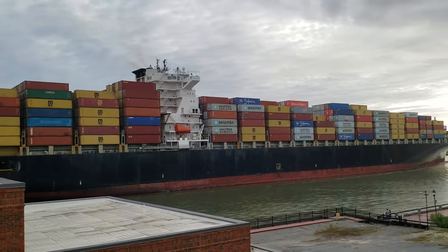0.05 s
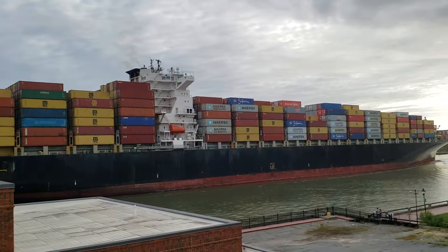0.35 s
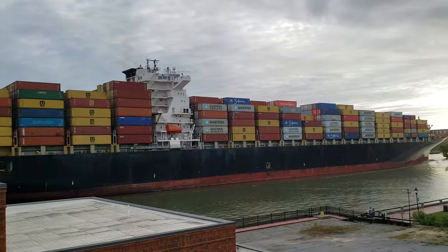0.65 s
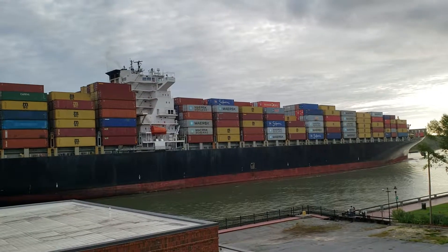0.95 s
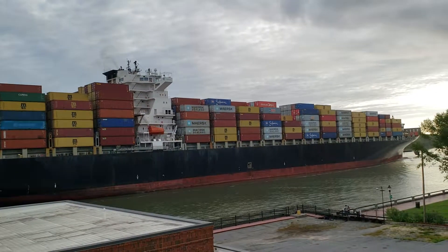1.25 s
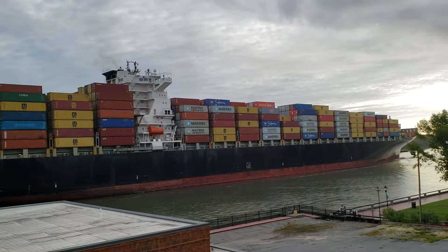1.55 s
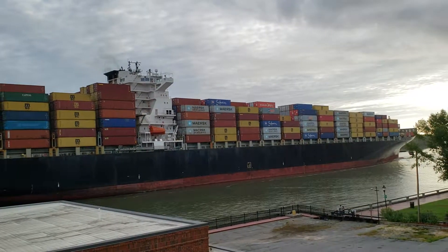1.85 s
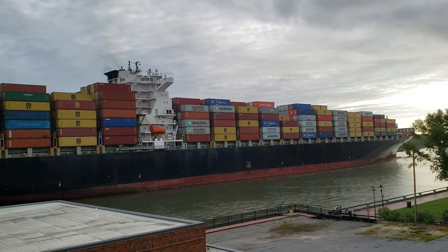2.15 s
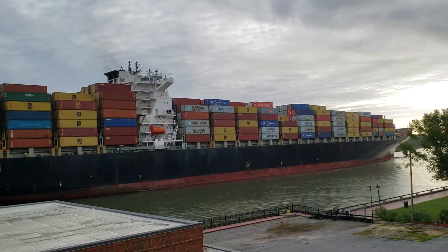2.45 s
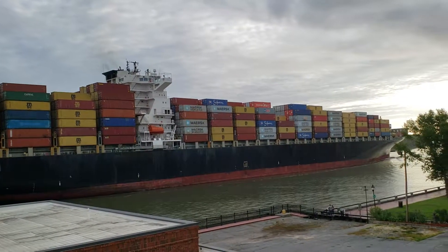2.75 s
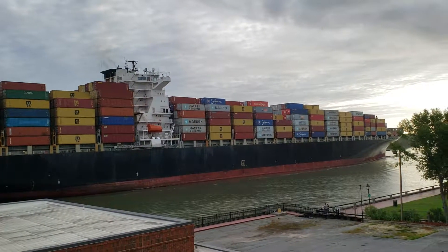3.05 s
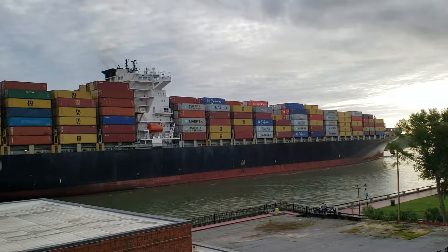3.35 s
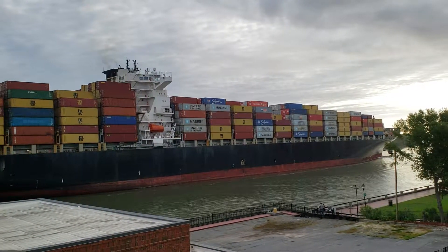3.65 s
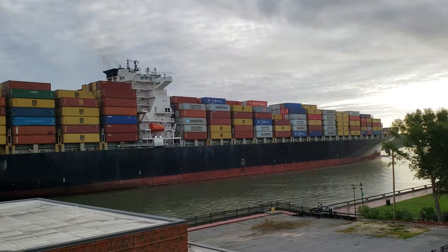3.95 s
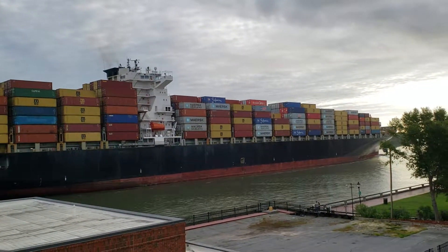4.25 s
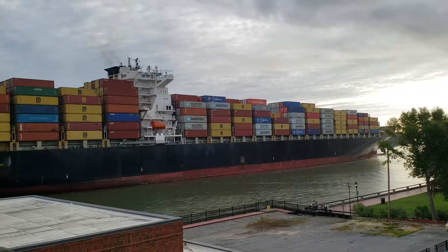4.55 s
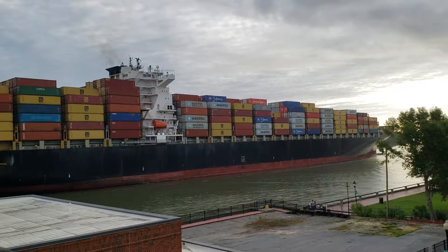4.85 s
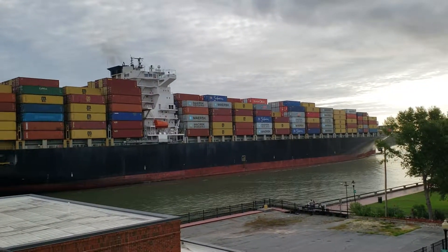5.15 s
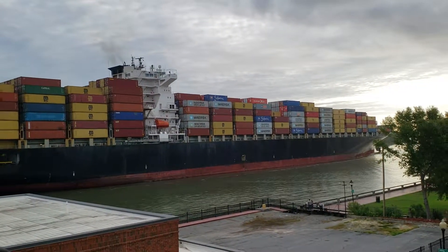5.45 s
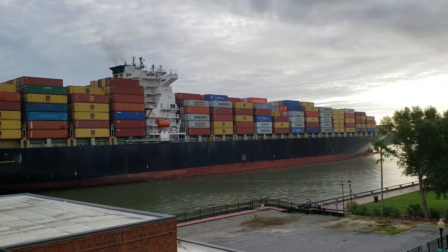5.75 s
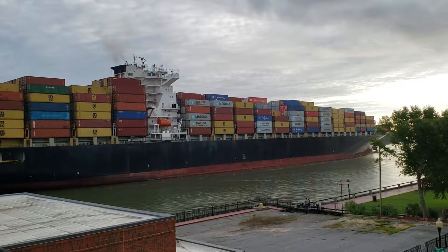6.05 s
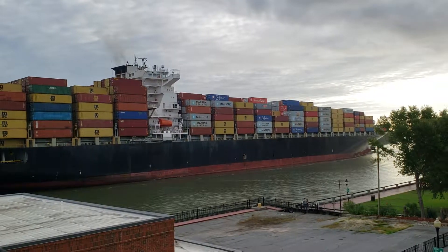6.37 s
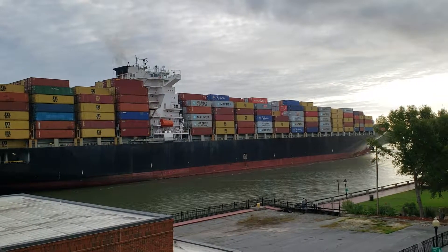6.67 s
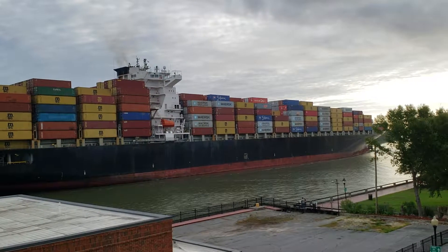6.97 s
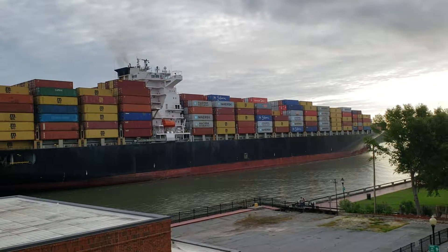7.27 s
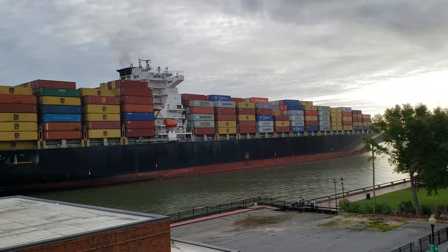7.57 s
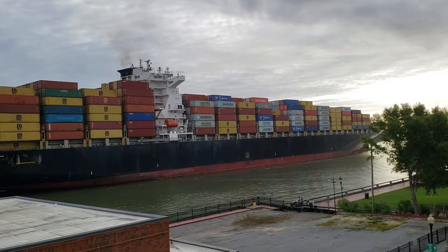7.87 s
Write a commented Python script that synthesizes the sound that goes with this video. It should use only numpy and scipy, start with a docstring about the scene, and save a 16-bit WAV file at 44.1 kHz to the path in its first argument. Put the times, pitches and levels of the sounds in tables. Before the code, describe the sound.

A container ship passes a river bank throughout: a low diesel rumble throbbing about six times a second, with funnel roar, rushing air, slowly beating hums and a very faint high hiss. In the first half second, a heavy steel door close by gives a double bang, a dull thud and then a sharper clattering blow, with a hard echo that fades over about a second. The ship continues alone and grows gradually, swelling slightly around 4 seconds, with fan tones wavering in and out from then on. At about 6.6 seconds the door slams, the loudest moment: the frame clashes, the latch snaps and the panel booms and rings. Loose metal jingles brightly with it, and softer knocks and ticks follow from 7.1 to 7.5 seconds. After the slam the ship's rumble is somewhat quieter and runs on until the end, near 8 seconds.

```python
"""A container ship glides past a river bank: its diesel throbs six times a second under the roar
of funnel and rushing air, with beating machine hums, fan tones and a thin hiss.
Close by, a heavy steel door bangs in a hard, echoing space: a double blow at the start, a full slam
at 6.6 s. The frame clashes, the latch snaps, the leaf booms; the slam shakes loose metal.
The recorder's gain control ducks the ship after the slam."""
import sys
import numpy as np
from scipy import signal
from scipy.fft import rfft, irfft
from scipy.io import wavfile
from scipy.ndimage import uniform_filter1d

SR = 44100
rng = np.random.default_rng(int(sys.argv[2]) if len(sys.argv) > 2 else 0)


def bounce(signal):
    """Save signal as a 16-bit WAV file at the path given by the first command-line argument."""
    frames = np.transpose(np.atleast_2d(signal))
    limited = np.clip(frames, -1, 1)
    pcm = np.round(limited * 32767).astype(np.int16)
    wavfile.write(sys.argv[1], SR, pcm)


N = 348816
T = np.arange(N) / SR

CYCLE_HZ, THROB_S = 5.967, 0.1  # engine cycle; time of one throb
ABEAM_S, BEAM_S, HOLD_S = 3.97, 0.83, 5.7  # stern nearest; facing half-width; tone trends stop
PASSED_S = np.minimum(T, HOLD_S) - ABEAM_S
FACING = np.exp(-((T - ABEAM_S) / BEAM_S) ** 2)  # how squarely the vents face the bank, 0-1

# exhaust orders (multiple of engine cycle, relative level abeam [dB], trend [dB/s])
EXHAUST_ORDERS = [(7, -42, 0.4), (8, -30, .5), (9, -34, -0.6), (11, -50.5, 1), (12, -50, 1.5),
                  (13, -52.5, -2.5), (14, -51, 8.5), (15, -43.5, 3.5), (16, -38.5, -.3), (18, -49.5, 0.2),
                  (20, -53.5, -1), (21, -50, 0.6), (23, -50, 0.3), (24, -50.5, 2), (29, -51, 2.5)]
# machine hums (frequency [Hz])
HUM_HZ = [55.5, 58.85, 59.55, 60.15]
# same hums (level abeam [dB])
HUM_ABEAM_DB = [-52, -38.5, -43, -42]
# engine room fan (blade harmonic, relative level [dB], share of swell [0-1], gain when facing [dB])
FAN_TONES = [(2, -2, 0.37, -5.5), (3, 0, 1, -2.5), (4, -7, 0, 5), (5, -10, 0, -1), (6, -18.5, 0, -3)]
# swells of the strongest fan tone (time [s], level before flutter and facing [dB])
FAN_SWELLS = [(1.7, -65), (3.7, -59), (4.15, -53), (4.95, -48), (5.25, -56), (5.7, -50), (6.0, -59),
              (6.4, -47), (7.4, -58)]
# funnel roar (frequency [Hz], relative density [dB])
ROAR_SPECTRUM = [(90, -27), (150, -16), (210, -4), (280, -6.5), (400, -7), (470, -11.5), (600, -9),
                 (750, -15), (950, -16), (1200, -22), (1700, -27), (3000, -72)]
# rushing air, with the microphone's bright 4-8 kHz colouring (frequency [Hz], relative density [dB])
AIR_SPECTRUM = [(100, -30), (700, -2), (1500, 0), (2000, 0), (2800, -3.5), (3300, -9), (4200, -8.5),
                (5200, -9.5), (6000, -6), (6650, -15), (7500, -10), (8300, -24), (13000, -27), (15800, -27)]
# exhaust rumble (frequency [Hz], relative density [dB])
RUMBLE_SPECTRUM = [(10, -50), (20, -32), (30, -22), (40, -10), (52, -3), (75, -5), (105, -1), (135, -7),
                   (170, -12), (230, -15), (400, -35), (1500, -120)]
# high hiss (frequency [Hz], relative density [dB])
HISS_SPECTRUM = [(6500, -28), (8500, -10), (10000, -7), (10900, 0.5), (11900, 1.5), (12700, -5),
                 (15500, -17)]
# hiss envelope (time [s], relative level [dB])
HISS_ENVELOPE = [(1.4, -70), (2.2, -67), (3.6, -69), (4.3, -77.5), (4.9, -73.5), (5.6, -77.5), (7.7, -79)]
# door blows, levels relative (time [s], clash [dB], latch [dB], boom [dB], boom centre [Hz],
# latch direct-to-echo power [ratio], slap [dB])
DOOR_BLOWS = [(0, -30, -47, -28, 191, 0.73, -4), (.03, -33, -42, -20, 90, 0.35, 2),
              (.285, -21, -32.5, -34, 233, 2.7, -8), (.342, -27.5, -58, -34.5, 283, 0.33, 18.5),
              (.441, -31, -33, -32, 125, 3, 22), (.486, -27, -38, -23.5, 133, .3, 13),
              (6.61, -25, -22.5, -17.5, 170, 1.9, 9), (6.616, -17, -17.5, -12.5, 148, 0.42, 4),
              (6.66, -14.5, -16, -19, 242, 0.39, 14), (6.735, -18.5, -34, -22, 290, 0.55, 8),
              (7.097, -51, -45, -28, 101, 2.5, 0), (7.16, -42, -45, -29.5, 179, 1.6, 6),
              (7.346, -40.5, -49.5, -48, 283, 0.52, -3)]
# steel frame (frequency [Hz], relative density [dB])
CLASH_SPECTRUM = [(25, -43), (50, 6), (110, -2.5), (200, 3), (300, -1), (550, -2.5), (800, -7.5),
                  (1400, -15.5), (2600, -27), (4000, -33), (7500, -29), (9000, -51), (15500, -39)]
# slap of a flat, hard contact (frequency [Hz], share of slap gain [0-1])
SLAP_SHARE = [(700, 0.23), (1400, 0.32), (2600, 0.86), (4500, 1), (8000, 0.083)]
# latch (frequency [Hz], relative density [dB])
LATCH_SPECTRUM = [(1000, -13.5), (2500, -3.5), (3400, -5), (4100, -1), (5400, 2.5), (6400, -2),
                  (7400, -7.5), (8500, -21), (12500, -16.5), (15500, -34)]
# door leaf (frequency [Hz], relative level [dB], T60 [s])
LEAF_MODES = [(87.6, 4.5, 0.64), (106.2, -5.5, 1.4), (128.6, -3, 1.8), (144.9, 5.5, 0.54),
              (173.4, -3.5, 1.4), (205.2, -7, 0.43), (265.2, -6.5, 2.3), (287.7, -2, 2), (321, -7.5, 1.34),
              (373, -20, 1), (502, 2, 0.98), (523, -6, 1.2)]
# echo around the door (frequency [Hz], T60 [s])
ECHO_T60 = [(80, 0.36), (200, 1.81), (500, 1.25), (1000, 1.195), (2500, 1.01), (5500, 0.81), (12000, 0.83)]
# loose metal shaken by the slam (time [s], level [dB])
JINGLES = [(6.668, -33), (6.725, -36), (6.985, -59), (7.098, -53), (7.16, -54), (7.353, -63), (7.398, -55),
           (7.497, -65), (7.75, -62)]
# loose metal (frequency [Hz], relative density [dB])
JINGLE_SPECTRUM = [(3000, -29), (5500, -8), (7500, -5), (9500, 0), (12500, 4), (15500, 1)]
# microphone pair (frequency [Hz], left-right correlation before clipping to +-1)
CORRELATION = [(60, 1.1), (130, 0.65), (290, 0.83), (640, 0.22), (1410, -0.3), (3100, 0), (15000, 0)]
# ship balance (frequency [Hz], left minus right [dB])
SHIP_SIDE = [(60, 0.5), (110, -0.5), (200, 1.0), (380, 1.5), (700, 1.0), (1290, 0.5), (2380, 0.0),
             (4400, -3.0), (8120, -4.5), (15000, -1.5)]
# door balance (frequency [Hz], left minus right [dB])
DOOR_SIDE = [(60, 0.5), (110, 0.5), (200, 0.5), (380, 2.5), (700, 3.5), (1290, 0.5), (2380, 0.0),
             (4400, -5.5), (8120, -8.0), (15000, -4.0)]


def gain_of(db):
    """Decibels to amplitude."""
    return 10 ** (np.asarray(db) / 20)


def unit_rms(x):
    """Scales to rms 1."""
    return x / np.sqrt(np.mean(x ** 2) + 1e-20)


def lookup(table, hz):
    """Interpolates on a log-frequency axis."""
    table_hz, value = np.transpose(table)
    return np.interp(np.log(hz + 1), np.log(table_hz + 1), value)


def add(mix, start_s, sound):
    """Mixes in a stereo sound."""
    part = mix[:, max(round(start_s * SR), 0):][:, :sound.shape[1]]
    part += sound[:, :part.shape[1]]


def drift(rate_hz):
    """Slow random signal, rms 1."""
    hz = np.fft.rfftfreq(N, 1 / SR)
    return unit_rms(irfft(rfft(rng.standard_normal(N)) * np.exp(-(hz / rate_hz) ** 2), N))


def diffuse(spectrum, side, size=N):
    """Stereo noise, rms 1: correlated in the bass, independent in the treble."""
    hz = np.fft.rfftfreq(size, 1 / SR)
    left, other = rfft(rng.standard_normal((2, size)))
    correlation = np.clip(lookup(CORRELATION, hz), -1, 1)
    right = correlation * left + np.sqrt(1 - correlation ** 2) * other
    lean_db = lookup(side, hz) / 2
    pair = np.array([left * gain_of(lean_db), right * gain_of(-lean_db)])
    return unit_rms(irfft(pair * gain_of(lookup(spectrum, hz)), size))


def shaped(x, field_db):
    """Applies the gain field_db(frequency [Hz], time [s])."""
    hz, t, frames = signal.stft(x, SR, nperseg=512, noverlap=384)
    frames = frames * gain_of(field_db(hz[:, None], t))
    return signal.istft(frames, SR, nperseg=512, noverlap=384)[1][:, :x.shape[1]]


def diesel(trim_db=-0.47, facing_db=2.0, waver_db=1.36, rough_db=2, wander_cycles=0.025):
    """Uneven cylinders make low orders that swell together once a cycle, under a rough drone."""
    cycles = CYCLE_HZ * (T - THROB_S)
    out = np.zeros(N)
    for order, abeam_db, trend_db_per_s in EXHAUST_ORDERS:
        high = order > 11  # the drone: random phases, more waver
        phase = order * cycles + high * rng.random() + wander_cycles * drift(1.7)
        depth_db = rough_db if high else waver_db
        level_db = abeam_db + trend_db_per_s * PASSED_S + depth_db * drift(2.4)
        out += gain_of(level_db) * np.cos(2 * np.pi * phase)
    return np.sqrt(2) * gain_of(trim_db + facing_db * FACING) * out


def machines(growth_db_per_s=1.6, waver_db=1.5, in_phase_s=5.56):
    """Closely tuned hums beat and grow as the stern comes round."""
    out = np.zeros(N)
    for hz, db in zip(HUM_HZ, HUM_ABEAM_DB):
        out += gain_of(db + waver_db * drift(0.61)) * np.cos(2 * np.pi * hz * (T - in_phase_s))
    return np.sqrt(2) * gain_of(growth_db_per_s * PASSED_S) * out


def fan(blade_hz=179.2, base_db=-56.5, growth_db_per_s=2.0, flutter_db=4.0, wander_cycles=0.068):
    """Blade harmonics grow with the approach, swell, and flutter on their way across the water."""
    steady_db = base_db + growth_db_per_s * PASSED_S
    swell_db = np.interp(T, *np.transpose(FAN_SWELLS)) - steady_db
    cycles = blade_hz * T + np.array([[0], [0.025]])  # right channel leads
    out = np.zeros((2, N))
    for harmonic, db, share, facing_db in FAN_TONES:
        phase = harmonic * cycles + wander_cycles * drift(1.5)
        level_db = steady_db + db + share * swell_db + facing_db * FACING + flutter_db * drift(3.6)
        out += gain_of(level_db) * np.cos(2 * np.pi * phase)
    return np.sqrt(2) * out


def vent_noise(spectrum, base_db, growth_db_per_s, facing_db):
    """One turbulent flow: grows steadily, louder while it faces the bank."""
    level_db = base_db + growth_db_per_s * (T - ABEAM_S) + facing_db * FACING
    return diffuse(spectrum, SHIP_SIDE) * gain_of(level_db)


def vents(patchy_db=0.93, throb_depth=0.093):
    """Funnel roar and rushing air; the exhaust rumble pulses with the engine."""

    def patches_db(hz, t):
        """Moving air lifts and drops patches of the sound on its way."""
        cells = rng.standard_normal((len(hz), len(t)))
        bands = uniform_filter1d(cells, 5, axis=0)
        return patchy_db * unit_rms(uniform_filter1d(bands, 30, axis=1))

    roar = vent_noise(ROAR_SPECTRUM, base_db=-45.0, growth_db_per_s=0.8, facing_db=1.06)
    air = vent_noise(AIR_SPECTRUM, base_db=-52.0, growth_db_per_s=0.38, facing_db=2.0)
    rumble = vent_noise(RUMBLE_SPECTRUM, base_db=-37.5, growth_db_per_s=0.65, facing_db=0.8)
    throb = 1 + throb_depth * np.cos(2 * np.pi * CYCLE_HZ * (T - THROB_S))
    return shaped(roar + air, patches_db) + rumble * throb


def hiss(trim_db=5.5, flicker_db=1.5):
    """Thin, high hiss that flickers and fades."""
    level_db = np.interp(T, *np.transpose(HISS_ENVELOPE)) + trim_db
    return diffuse(HISS_SPECTRUM, SHIP_SIDE) * gain_of(level_db + flicker_db * drift(40))


def clatter(spectrum, direct_ratio, direct_s, build_s, attack_s):
    """Steel on steel: a short burst, then an echo that builds and dies band by band."""
    t = np.arange(2 * SR) / SR
    noise = diffuse(spectrum, DOOR_SIDE, len(t))
    tail = shaped(noise, lambda hz, age_s: -60 * age_s / lookup(ECHO_T60, hz))
    power = direct_ratio * np.exp(-t / direct_s) + 1 - np.exp(-t / build_s)
    return tail * np.sqrt(power) * (1 - np.exp(-t / attack_s))


def boom(centre_hz, width_octaves=0.42, rise_s=0.011):
    """The leaf rings around centre_hz: low for a soft push, higher for a hard knock."""
    t = np.arange(2 * SR) / SR
    hz, db, t60_s = np.transpose(LEAF_MODES)[:, :, None]
    weight = gain_of(db) * np.exp(-0.5 * (np.log2(hz / centre_hz) / width_octaves) ** 2)
    envelopes = weight / np.linalg.norm(weight) * gain_of(-60 * t / t60_s)
    modes = envelopes * np.sin(2 * np.pi * (hz * t + rng.random(hz.shape)))
    return np.sqrt(2) * modes.sum(0) * (1 - np.exp(-(t / rise_s) ** 2))


def door(trim_db=3.0):
    """Each blow clashes the frame, snaps the latch and booms the leaf."""
    out = np.zeros((2, N))
    for start_s, clash_db, latch_db, boom_db, centre_hz, direct_ratio, slap_db in DOOR_BLOWS:
        spectrum = [(hz, db + slap_db * lookup(SLAP_SHARE, hz)) for hz, db in CLASH_SPECTRUM]
        clash = clatter(spectrum, direct_ratio=0.36, direct_s=0.027, build_s=0.023, attack_s=0.0012)
        latch = clatter(LATCH_SPECTRUM, direct_ratio, direct_s=0.034, build_s=0.079, attack_s=0.0024)
        blow = gain_of(clash_db) * clash + gain_of(latch_db) * latch + gain_of(boom_db) * boom(centre_hz)
        add(out, start_s, blow)
    return gain_of(trim_db) * out


def jingles(attack_s=0.003, fade_s=0.043, grain_db=3):
    """Loose metal, shaken by the slam, gives clusters of bright ticks."""
    t = np.arange(SR // 2) / SR
    out = np.zeros((2, N))
    for start_s, db in JINGLES:
        grain = unit_rms(uniform_filter1d(rng.standard_normal(len(t)), 90))
        envelope = gain_of(db + grain_db * grain) * np.exp(-t / fade_s) * (1 - np.exp(-t / attack_s))
        add(out, start_s, envelope * diffuse(JINGLE_SPECTRUM, DOOR_SIDE, len(t)))
    return out


def scene():
    """Ship across the water, door close by."""
    bass = (diesel() + machines()) * gain_of([[0.3], [-0.3]])  # slightly left
    return bass + fan() + vents() + hiss() + door() + jingles()


def record(dry, threshold_db=-16.5, duck_db_per_db=0.75, fall_s=0.05, recover_db_per_s=1, edge_hz=15780):
    """Gain control with fast fall and slow recovery, then soft limiter and low-pass."""
    power = signal.lfilter([1 / 900], [1, 1 / 900 - 1], (dry ** 2).mean(0))  # 20 ms average
    over_db = np.maximum(10 * np.log10(power + 1e-12) - threshold_db, 0)
    recovery_db = T * recover_db_per_s
    held_db = np.maximum.accumulate(over_db + recovery_db) - recovery_db
    step = 1 / (fall_s * SR)
    duck_db = duck_db_per_db * signal.lfilter([step], [1, step - 1], held_db)
    ducked = dry / gain_of(duck_db)
    limited = ducked / (1 + ducked ** 8) ** (1 / 8)
    lowpass = signal.firwin(511, edge_hz, window=("kaiser", 9), fs=SR)
    return signal.oaconvolve(limited, lowpass[None], "same")


dry = scene()
out = record(dry)
bounce(out)
```